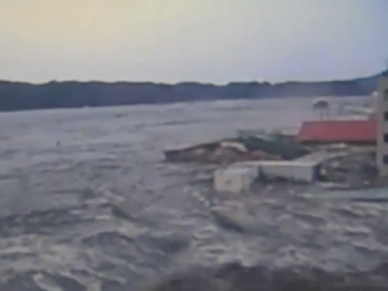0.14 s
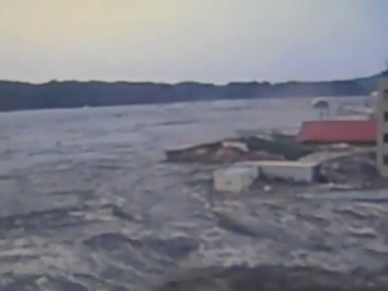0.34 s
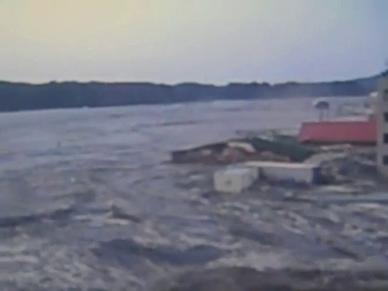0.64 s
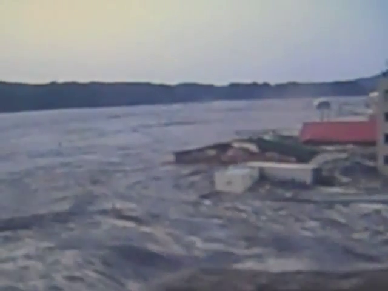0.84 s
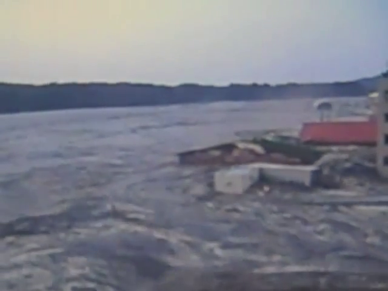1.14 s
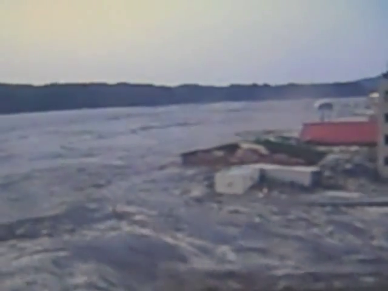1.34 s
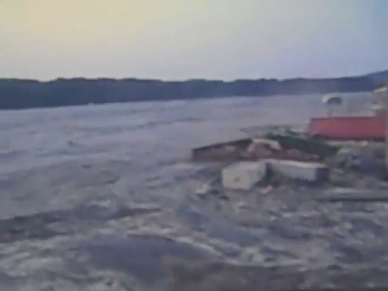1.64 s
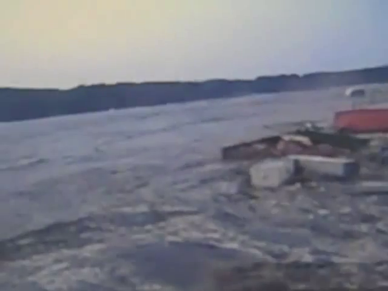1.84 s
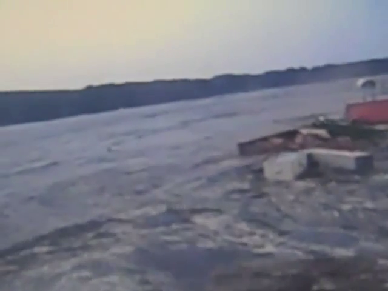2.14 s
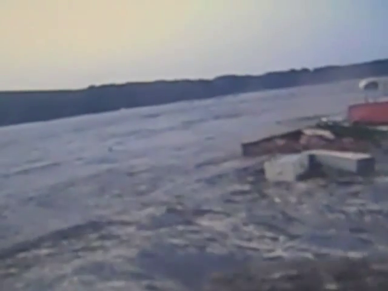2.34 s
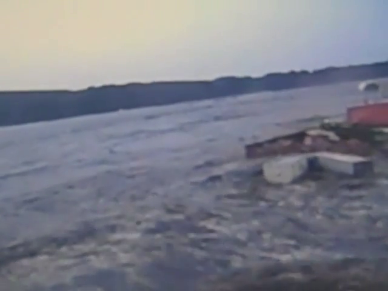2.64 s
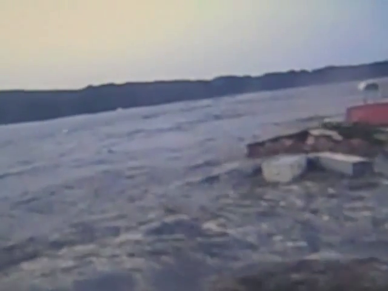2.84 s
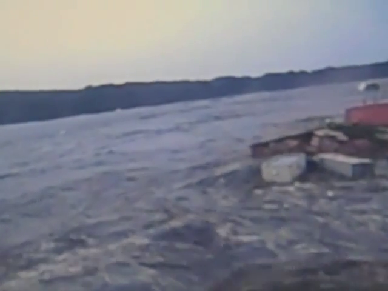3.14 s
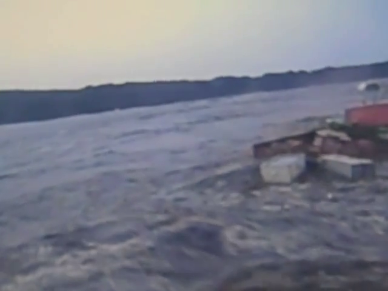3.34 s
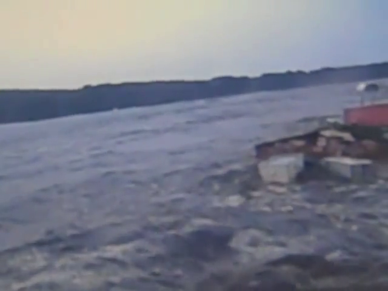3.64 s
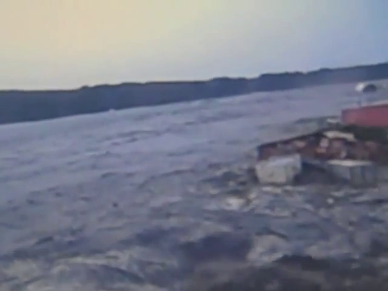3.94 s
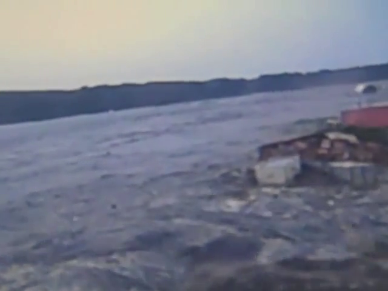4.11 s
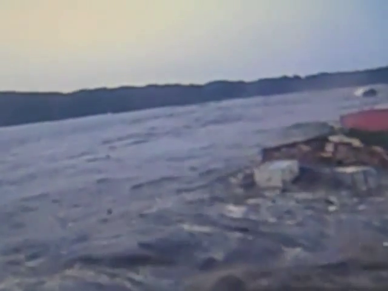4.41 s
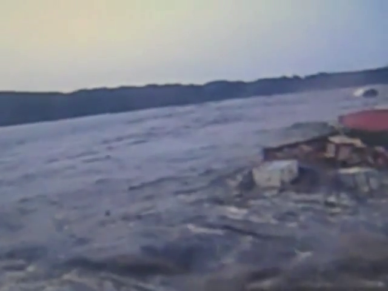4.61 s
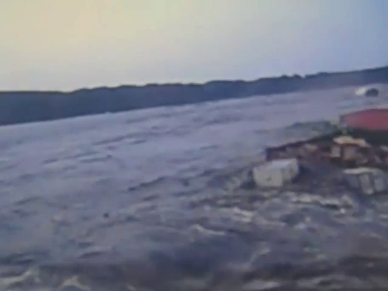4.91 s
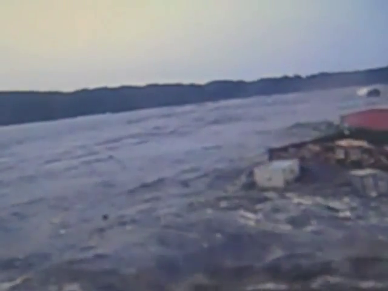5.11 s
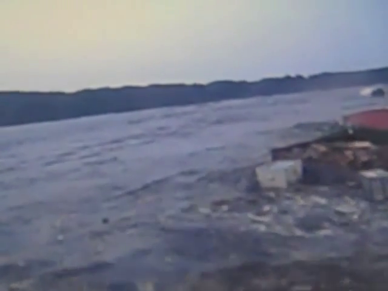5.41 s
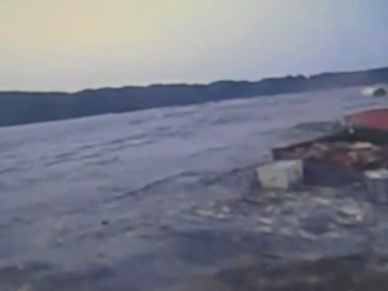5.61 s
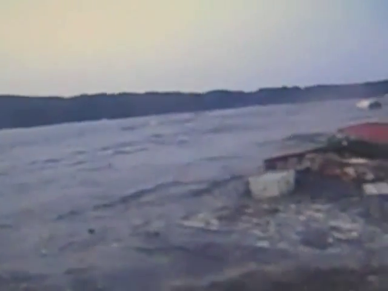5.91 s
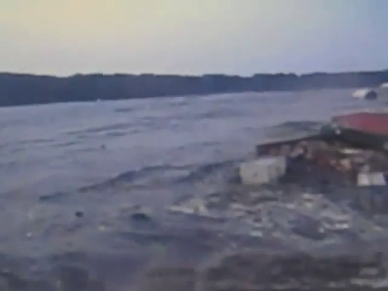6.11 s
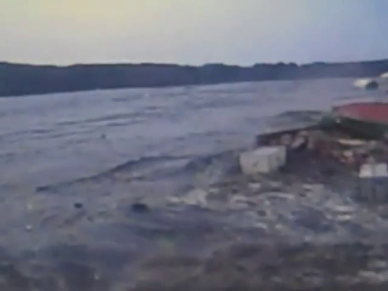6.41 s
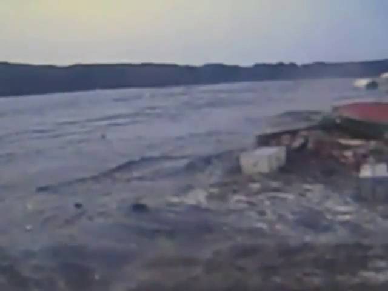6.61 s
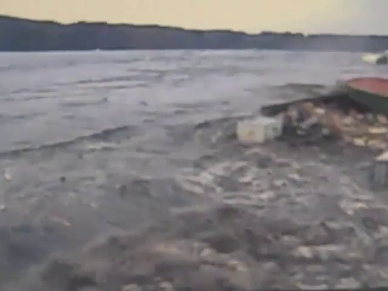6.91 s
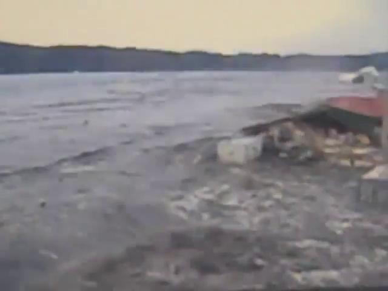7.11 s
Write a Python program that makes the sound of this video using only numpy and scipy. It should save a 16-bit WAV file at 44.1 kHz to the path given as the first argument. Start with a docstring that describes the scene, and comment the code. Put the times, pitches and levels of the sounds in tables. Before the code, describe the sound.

Churning floodwater roars steadily outdoors from start to finish, its foam bubbling unevenly and its spray hissing on top. Short slaps of waves and scrapes of drifting debris poke through here and there. In the second half the water breaks a bit harder over the wreckage. The microphone gives it a boxy, slightly ringing tone with little deep bass, and picks up very faint buffeting thumps.

```python
"""One unbroken rush: a flood pours over the land, carrying wreckage.
A deep current and a churning roar lie under the wash of breaking water, its crests and a hiss of spray.
Each is noise, made lumpy as foam bursts and dies; now and then a wave slaps or wreckage scrapes.
Faint low bumps sit underneath. Fixed resonances and close reflections make it boxy and narrow in band."""
import sys
import numpy as np
from scipy import signal
from scipy.fft import rfft, irfft
from scipy.io import wavfile
from scipy.ndimage import uniform_filter1d

SR = 44100
rng = np.random.default_rng(int(sys.argv[2]) if len(sys.argv) > 2 else 0)


def generate_wav(signal):
    """Clip the signal to [-1, 1] and save it as 16-bit WAV at the path in sys.argv[1]."""
    frames = np.transpose(np.atleast_2d(signal))
    scaled = np.clip(frames, -1, 1) * 32767
    pcm = np.round(scaled).astype(np.int16)
    wavfile.write(sys.argv[1], SR, pcm)


N = 320166
TIME_S, FREQ_HZ = np.arange(N) / SR, np.fft.rfftfreq(N, 1 / SR)

# force of water breaking over wreckage, building in the second half: (time [s], relative level [dB])
BREAKING = [(0.0, -1), (0.75, -0.5), (1.3, -0.5), (2.45, -2), (3.35, -0.9), (4.0, -0.5), (4.2, 2),
            (4.5, 1.5), (4.75, 1.6), (5.1, 3.5), (5.9, 4), (6.4, 2.2), (6.9, 1.4), (7.26, 1.5)]


def gain_of(db):
    return 10 ** (np.asarray(db) / 20)


def unit_rms(x):
    return x / np.sqrt(np.mean(x ** 2) + 1e-20)


def over_freq(table, hz=FREQ_HZ):
    """Interpolate (frequency [Hz], value) on a log axis."""
    knots_hz, values = np.transpose(table)
    return np.interp(np.log(hz + 1), np.log(knots_hz + 1), values)


def over_time(table):
    return np.interp(TIME_S, *np.transpose(table))


def bell(offset, width):
    """Unit Gaussian; full width at half height."""
    return .5 ** ((2 * offset / width) ** 2)


def reflections(t60_s=0.13, direct=0.86, ear_spread=0.38, flatten_hz=110, above_hz=1300):
    """Dense close echoes comb the treble finely per ear; the broad colour stays flat."""
    shared, left, right = rng.standard_normal((3, N)) * gain_of(-60 * TIME_S / t60_s)
    echoes = rfft(shared + ear_spread * np.array([left, right])) / np.linalg.norm(shared)
    treble = FREQ_HZ ** 4 / (FREQ_HZ ** 4 + above_hz ** 4)
    comb = direct + echoes * treble
    return comb / np.sqrt(uniform_filter1d(abs(comb) ** 2, int(flatten_hz * N / SR), axis=1))


def space():
    """Frequency response per ear: resonances, echoes, balance and a small lag."""
    # fixed peaks and hollows: (frequency [Hz], width [Hz], gain [dB])
    resonances = [(183, 14, 5), (197, 12, -4), (300, 12, -8), (325, 22, 3), (370, 14, -6), (410, 22, 3),
                  (441, 16, -10), (553, 18, 3), (582, 12, -5), (608, 36, 3.5), (655, 18, 6.5),
                  (686, 14, -5), (778, 28, 4), (925, 26, 2), (1465, 30, 4), (1951, 26, 2), (3092, 16, 4),
                  (3141, 16, 3), (3347, 26, 5), (3900, 90, 3), (4380, 16, 4), (4631, 32, 4), (4950, 32, 5),
                  (5318, 20, 2), (5830, 45, 3), (6276, 20, 4), (6535, 20, 4)]
    # ear balance: (frequency [Hz], left minus right [dB])
    balance = [(200, -.3), (700, -1.1), (1300, -.7), (1650, 2), (2200, -.7), (2700, .3), (3020, 4.5),
               (3300, .7), (5400, -.3), (5900, 2), (6700, .5), (7200, 3.5), (7700, 3), (8700, 14)]
    # phase between ears: (frequency [Hz], left lead [rad])
    lead = [(200, 0), (800, .03), (1100, .15), (2100, -.1), (2330, -.7), (2800, -.1), (3100, -.9),
            (3350, -.2), (4300, -.55), (5400, -.45), (6120, -1.5), (6700, -.3), (7200, -1.9), (7800, -.5),
            (8600, -1.3)]
    ring_gain = gain_of(sum(db * bell(FREQ_HZ - hz, width_hz) for hz, width_hz, db in resonances))
    ringing = ring_gain * np.exp(-1j * signal.hilbert(np.log(ring_gain)).imag)  # minimum phase
    side = np.array([[.5], [-.5]])
    placement = gain_of(side * over_freq(balance)) * np.exp(1j * side * over_freq(lead))
    return ringing * reflections() * placement


def heave(rms_db=0.15, centre_hz=2.8, span_oct=1.5, count=24):
    """Swell [dB] shared by the roar, wash, crests and spray: random waves and a few lulls."""
    # brief dips in the rush: (time [s], width [s], gain [dB])
    lulls = [(1.884, 0.052, -1), (2.45, .12, -0.6), (3.78, 0.095, -3), (6.08, 0.14, -0.6), (6.45, .1, -1.5)]
    waves = sum(np.sin(2 * np.pi * (centre_hz * 2 ** (span_oct * (pace - .5)) * TIME_S + phase))
                for pace, phase in rng.random((count, 2)))
    return rms_db * unit_rms(waves) + sum(db * bell(TIME_S - s, width_s) for s, width_s, db in lulls)


def churn(patch_db, flicker_db, patch_s, patch_hz, flicker_s=.025, frame=512):
    """Stereo noise, lumpy in time and pitch as foam patches burst and die; slaps lift it briefly."""
    # likeness of the ears: (frequency [Hz], correlation [0..1])
    coherence = [(40, .4), (120, .7), (200, .96), (300, .98), (950, .99), (1240, .8), (1400, .94),
                 (1950, .98), (2250, .5), (2750, .93), (3300, .72), (5300, .8), (7000, .62), (8500, .3)]
    # wave slaps, wreckage scrapes: (time [s], width [s], centre [Hz], width [oct], lift [dB])
    slaps = [(0.247, 0.071, 3090, .35, 11), (0.754, .12, 1500, 1.1, 2.5), (.963, 0.034, 1900, 1.3, 5.5),
             (1.107, 0.07, 5400, .4, 4), (1.628, 0.061, 620, 0.32, 9), (1.747, .04, 2920, .13, 11),
             (2.081, 0.039, 608, 0.31, 11), (2.62, .08, 750, 0.7, 2.5), (2.78, .08, 1800, 1.1, 4.5),
             (2.79, .08, 5300, .4, 3), (3.528, 0.051, 1900, 0.74, 2), (3.707, .05, 1400, 0.67, 12),
             (4.13, .06, 5500, 0.62, 2), (4.415, .07, 1200, 1.6, 4.5), (4.417, .025, 2650, .3, 7),
             (4.504, .03, 2290, 0.97, 4), (4.573, 0.035, 5400, .3, 4.5), (5.138, .08, 1000, 1.6, 3),
             (5.283, .015, 750, .7, 7), (5.391, .08, 745, .8, 3), (5.511, .05, 5300, .2, 6.5),
             (5.612, .045, 5240, 0.26, 12.5), (5.618, .06, 2500, 1.1, 3), (5.672, .05, 647, .6, 5),
             (5.9, .07, 1700, 1.1, 4), (7.054, 0.045, 1900, 2.4, 5.5)]
    framing = dict(fs=SR, nperseg=frame, noverlap=frame - frame // 4)
    hz, t, spectra = signal.stft(rng.standard_normal((2, N)), **framing)
    alike = np.clip(over_freq(coherence, hz), 0, 1)[:, None]
    spectra[1] = alike * spectra[0] + np.sqrt(1 - alike ** 2) * spectra[1]
    patches = rng.standard_normal(spectra.shape[1:])
    patches = uniform_filter1d(patches, max(1, round(patch_s / t[1])), axis=1)
    patches = unit_rms(uniform_filter1d(patches, max(1, round(patch_hz / hz[1])), axis=0))
    flicker = unit_rms(uniform_filter1d(rng.standard_normal(len(t)), max(1, round(flicker_s / t[1]))))
    slap_db = sum(db * np.outer(bell(np.log2((hz + 1) / centre_hz), width_oct), bell(t - s, width_s))
                  for s, width_s, centre_hz, width_oct, db in slaps)
    spectra *= gain_of(patch_db * patches + flicker_db * flicker + slap_db)
    return signal.istft(spectra, **framing)[1][:, :N]


def water(noise, colour, ears, swell_db, base_db):
    """One flood layer: noise, coloured and placed, swelling about its base RMS level."""
    sound = irfft(rfft(noise) * gain_of(over_freq(colour)) * ears, N)
    return sound / sound.mean(0).std() * gain_of(base_db + swell_db)


def current(ears):
    """The deep current rumbles, drifting slowly in level."""
    # spectrum: (frequency [Hz], relative density [dB])
    colour = [(30, -78), (70, -39), (120, -21.5), (165, -16), (225, -3), (270, -3), (330, 1), (430, 2),
              (490, -4), (600, -36), (1200, -65.5)]
    # slow drift: (time [s], gain [dB])
    drift = [(0.0, 0.8), (0.9, -0.4), (1.2, 1.8), (2.5, 0), (3.1, 2), (3.8, -0.3), (4.6, -0.0),
             (6.05, -2.5), (6.25, 0.2), (6.9, 1.3), (7.26, -2.5)]
    noise = churn(patch_db=1.0, flicker_db=.54, patch_s=.14, patch_hz=200)
    return water(noise, colour, ears, over_time(drift), base_db=-39.5)


def roar(ears, heave_db):
    """Churning water roars in the low mids, barely following the breaking."""
    # spectrum: (frequency [Hz], relative density [dB])
    colour = [(100, -82), (330, -38.5), (420, -14.5), (490, -7.5), (580, -2.5), (605, 6.5), (700, 1),
              (920, 2.5), (1050, -13), (1170, -37), (1500, -51), (3000, -80.5)]
    noise = churn(patch_db=1.3, flicker_db=.67, patch_s=.04, patch_hz=200)
    return water(noise, colour, ears, heave_db + .12 * over_time(BREAKING), base_db=-27)


def wash(ears, heave_db):
    """Water breaks over wreckage: a midrange wash."""
    # spectrum: (frequency [Hz], relative density [dB])
    colour = [(150, -82), (600, -43.5), (820, -8), (960, -2.5), (1080, -7.5), (1230, -17), (1450, -10),
              (1720, -4.5), (1870, 1), (1960, 0.5), (2070, -6), (2170, -13.5), (2380, -16.5), (3400, -52)]
    noise = churn(patch_db=.87, flicker_db=.6, patch_s=.05, patch_hz=400)
    return water(noise, colour, ears, heave_db + .95 * over_time(BREAKING), base_db=-31)


def crests(ears, heave_db):
    """Wave crests rush brightly, following the breaking in full."""
    # spectrum: (frequency [Hz], relative density [dB])
    colour = [(700, -85.5), (2000, -47), (2400, -15.5), (2560, -4.5), (2720, 4), (3050, 1.5), (3400, -1),
              (3750, -5), (4200, -14), (5000, -52), (8000, -69)]
    noise = churn(patch_db=1.08, flicker_db=.8, patch_s=.04, patch_hz=500)
    return water(noise, colour, ears, heave_db + over_time(BREAKING), base_db=-28.5)


def spray(ears, heave_db):
    """Spray hisses on top with a drift of its own."""
    # spectrum: (frequency [Hz], relative density [dB])
    colour = [(1500, -86), (3500, -53), (4250, -10.5), (4600, -2.5), (4950, -2), (5270, 5.5), (5550, -3),
              (5900, 4), (6450, -2), (6750, -3), (7150, -1.5), (7900, -10.5), (8950, -26), (9300, -42)]
    # slow drift: (time [s], gain [dB])
    drift = [(0.0, -0.2), (0.55, 1), (1.6, -0.6), (1.95, -1.1), (2.55, -1.5), (3.4, -0.2), (3.85, 0.1),
             (4.15, 0.7), (4.8, -0.4), (5.6, 0.6), (5.9, -0.1), (6.3, 1.5), (6.9, 0.6), (7.26, 2)]
    noise = churn(patch_db=.92, flicker_db=.75, patch_s=.045, patch_hz=700)
    return water(noise, colour, ears, heave_db + over_time(drift), base_db=-27)


def bumps(width_s=0.031, hz=72, small_db=-68, spread_db=4, small_count=28, small_until_s=5.2):
    """Faint low bumps of a cycle or two, like buffeting air; random phase per ear."""
    # main bumps: (time [s], peak [dB])
    main = [(.445, -55), (.939, -61), (1.579, -61), (1.649, -56), (2.519, -64), (3.019, -60), (3.459, -64),
            (3.569, -61), (3.989, -63), (4.109, -55), (4.359, -61), (4.759, -63), (5.309, -61), (6.43, -63)]
    small = [(when * small_until_s, small_db + spread_db * (2 * size - 1))
             for when, size in rng.random((small_count, 2))]
    sound = np.zeros((2, N))
    for s, db in list(main) + small:
        near = slice(max(0, int((s - 2 * width_s) * SR)), int((s + 2 * width_s) * SR))
        t = TIME_S[near] - s
        tone = np.sin(2 * np.pi * (hz * t + rng.random((2, 1))))
        sound[:, near] += gain_of(db) * bell(t, width_s) * tone
    return sound


def scene():
    """Five water layers in one space, plus the bumps."""
    ears, heave_db = space(), heave()
    flood = current(ears) + sum(layer(ears, heave_db) for layer in (roar, wash, crests, spray))
    return flood + bumps()


def record(dry):
    """Steep low-pass."""
    cutoff_hz = 9250
    lowpass = signal.firwin(1023, cutoff_hz, window=("kaiser", 9), fs=SR)
    return signal.oaconvolve(dry, lowpass[None], "same", axes=1)


dry = scene()
out = record(dry)
generate_wav(out)
```